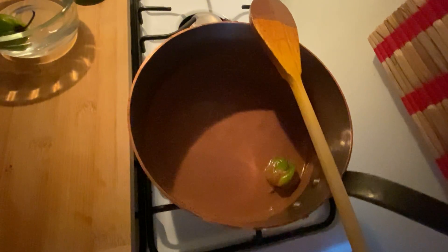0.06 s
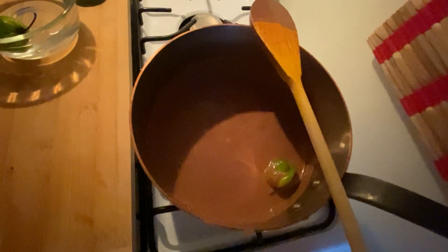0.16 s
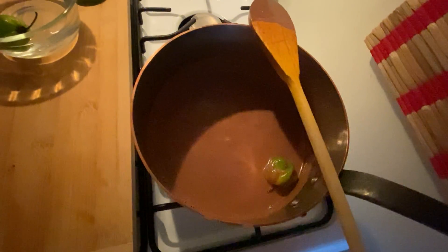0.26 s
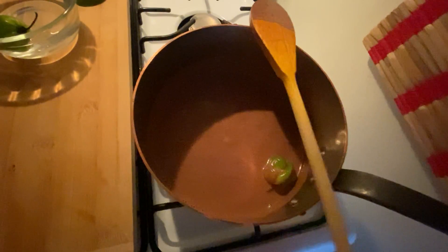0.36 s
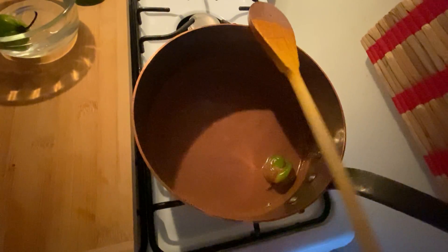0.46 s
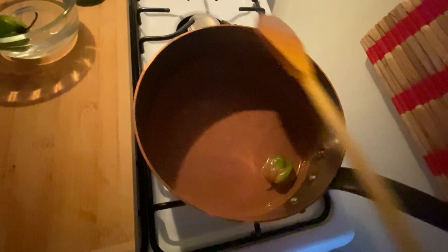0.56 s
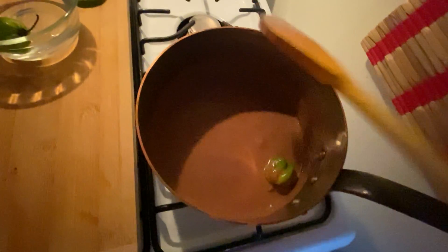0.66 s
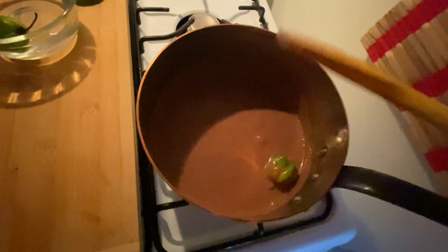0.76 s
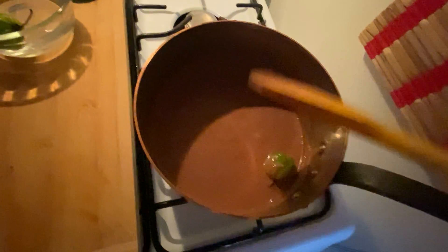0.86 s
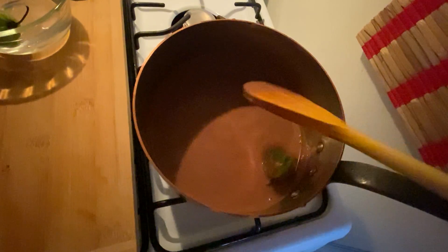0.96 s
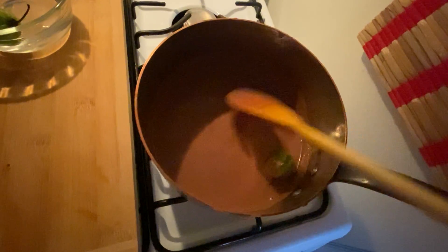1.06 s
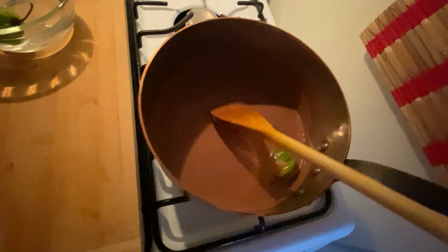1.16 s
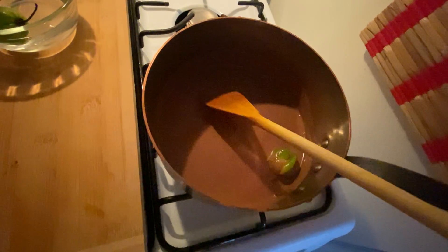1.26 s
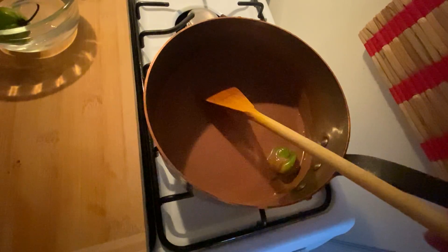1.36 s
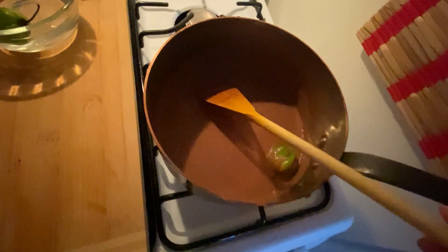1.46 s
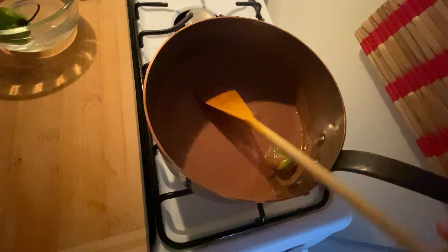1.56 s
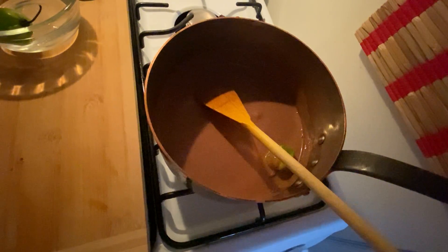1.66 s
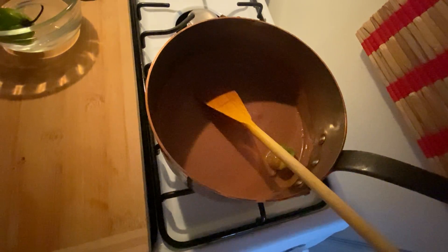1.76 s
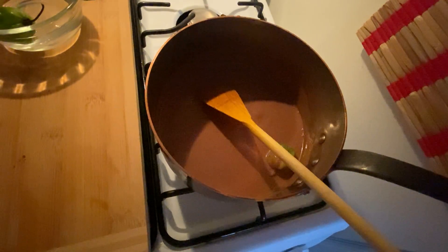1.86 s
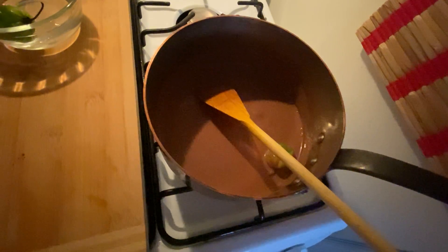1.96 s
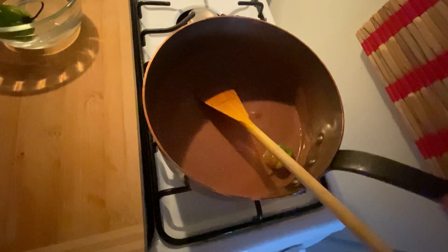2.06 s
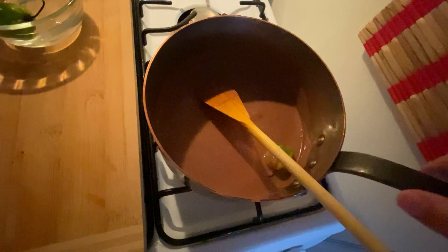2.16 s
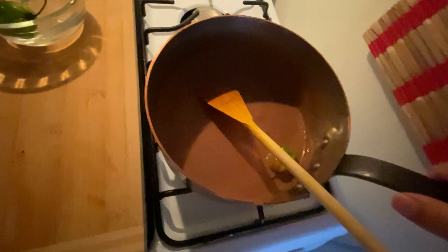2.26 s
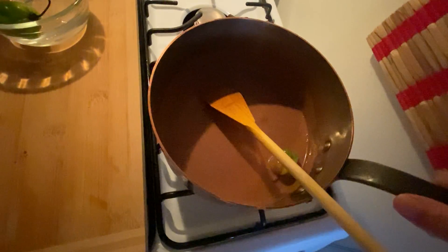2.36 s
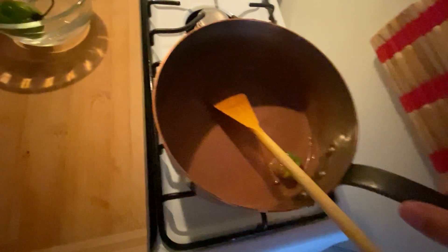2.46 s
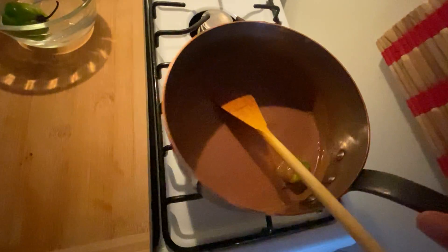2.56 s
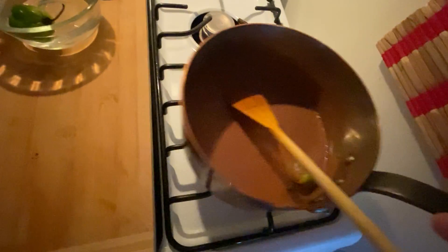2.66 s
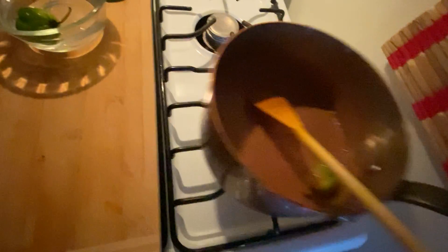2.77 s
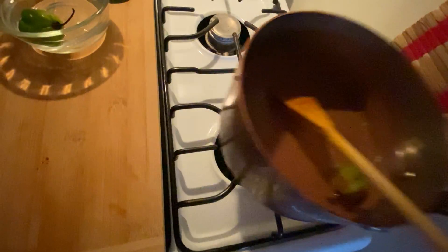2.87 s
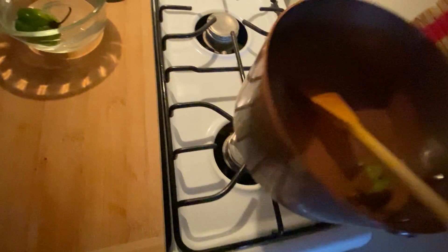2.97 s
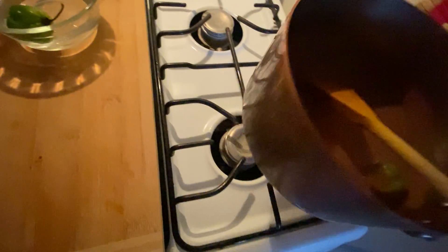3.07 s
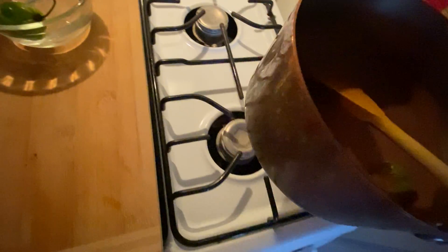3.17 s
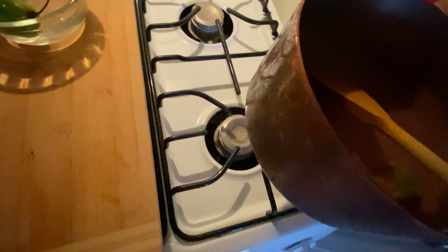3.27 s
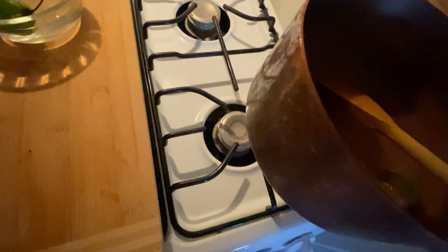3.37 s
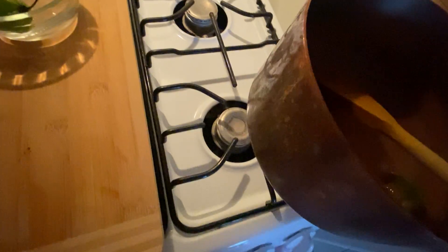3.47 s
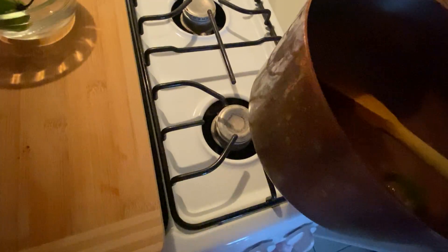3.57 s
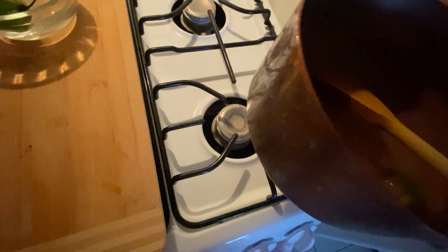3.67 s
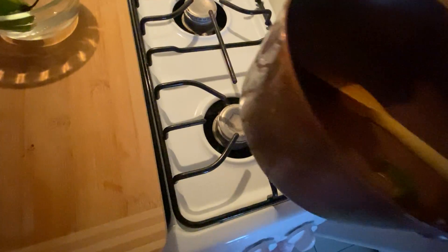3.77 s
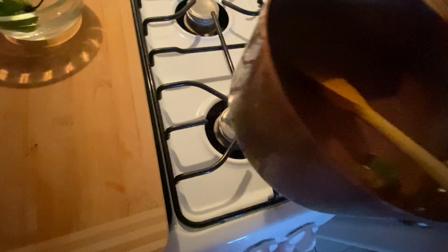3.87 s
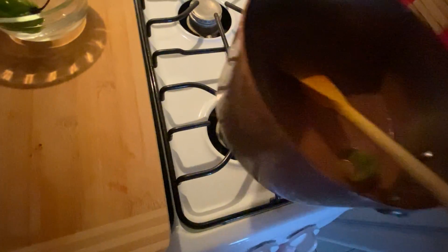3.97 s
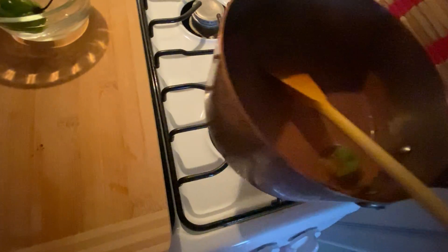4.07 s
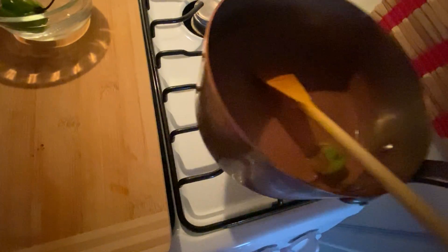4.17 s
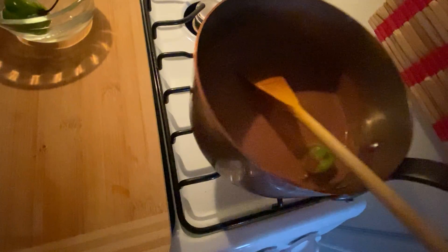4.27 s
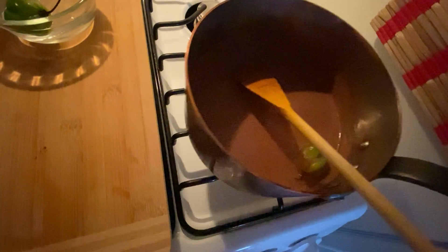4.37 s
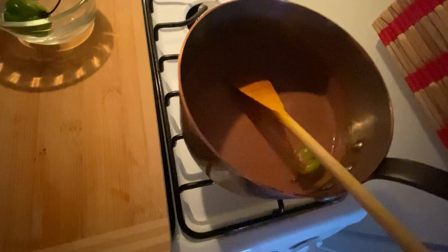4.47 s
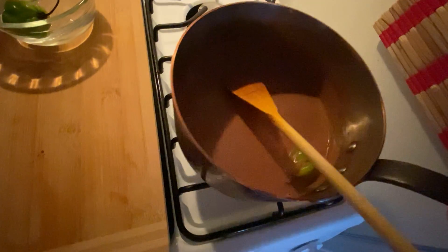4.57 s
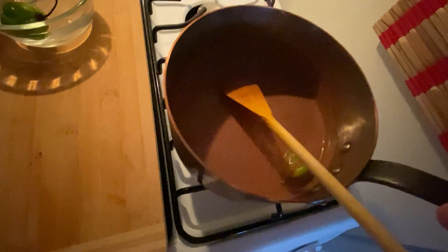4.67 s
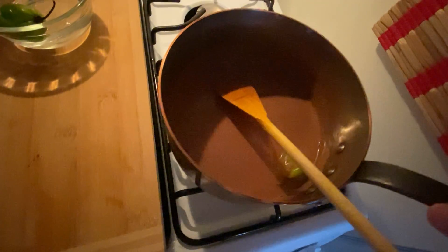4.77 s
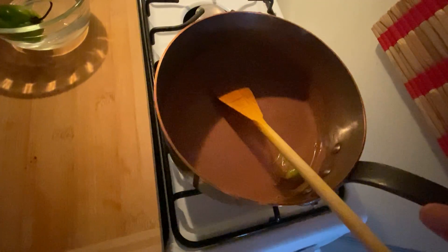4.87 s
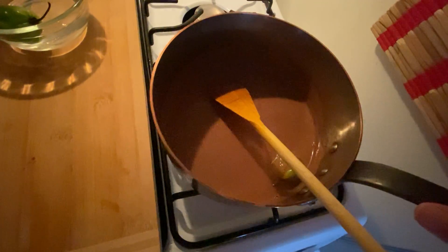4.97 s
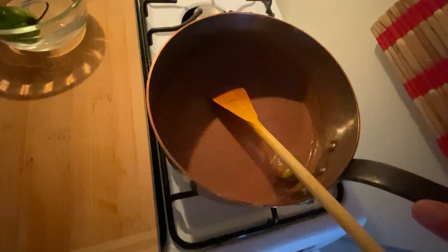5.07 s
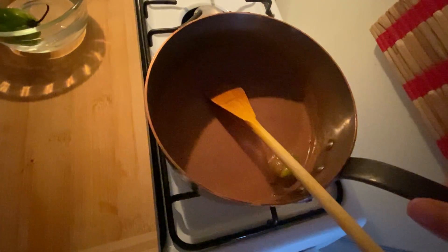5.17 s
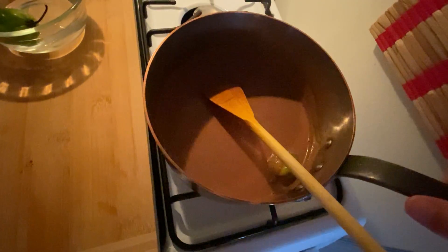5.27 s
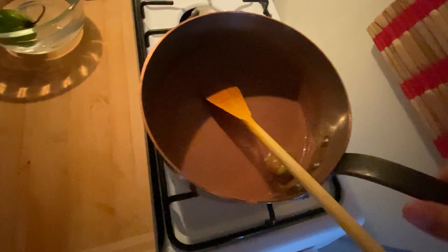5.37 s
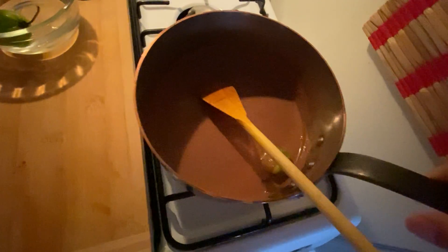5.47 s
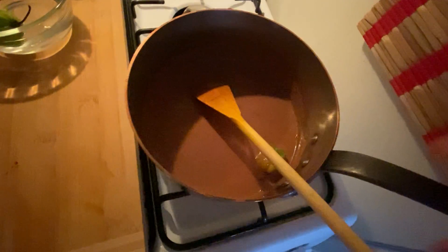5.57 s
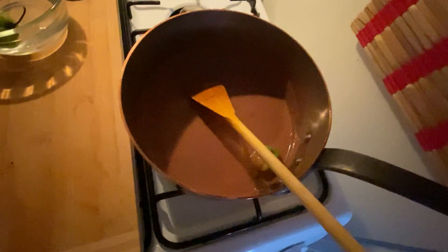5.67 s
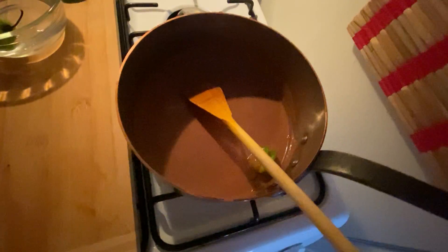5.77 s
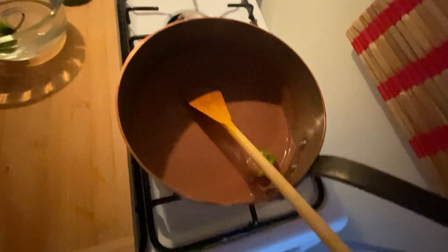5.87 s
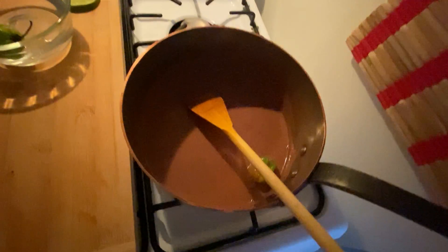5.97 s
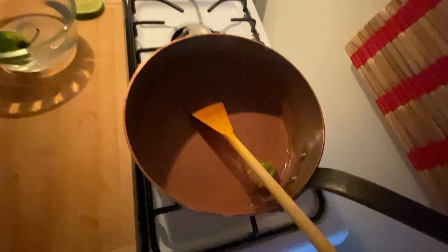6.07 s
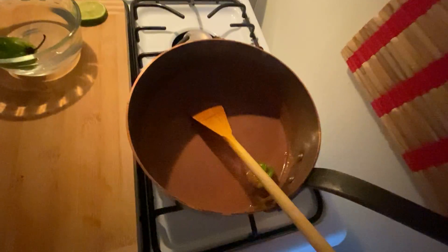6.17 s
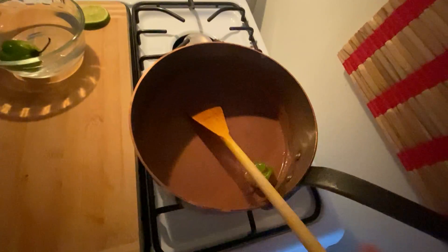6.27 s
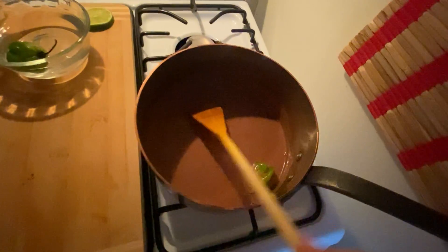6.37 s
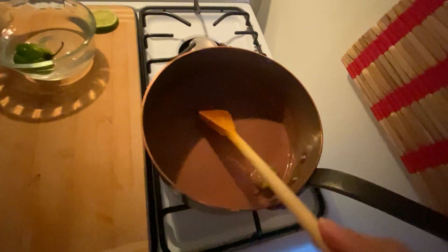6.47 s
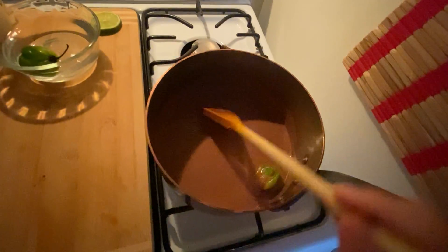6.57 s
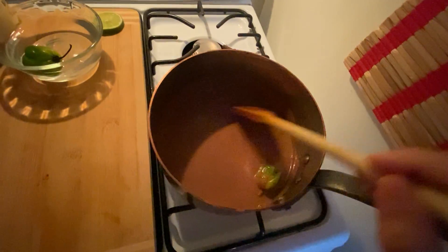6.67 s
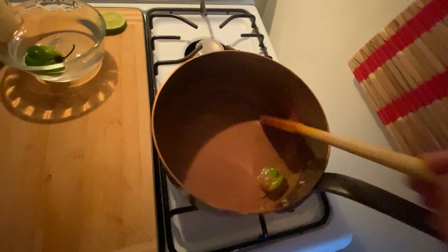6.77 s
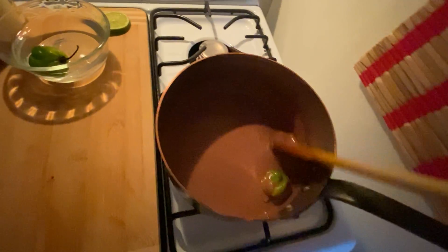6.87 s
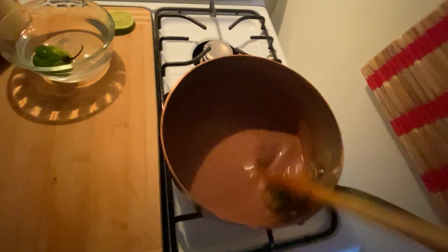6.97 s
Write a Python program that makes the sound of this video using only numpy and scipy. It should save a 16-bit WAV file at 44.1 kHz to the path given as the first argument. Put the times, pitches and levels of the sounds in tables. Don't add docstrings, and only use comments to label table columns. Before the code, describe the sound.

In a small kitchen, a low refrigerator hum with a faint buzz runs throughout. Soft sleeve and finger rubs lead to a woody knock as a spoon is laid in a copper pan, then settles on its rim. The pan rattles off an iron grate, ticks while held, lands with a loud clatter, is nudged, and the spoon raps the rim. Close handheld stereo microphone.

```python
import sys
import numpy as np
from scipy import signal
from scipy.fft import rfft, irfft, next_fast_len
from scipy.io import wavfile
from scipy.ndimage import uniform_filter1d, map_coordinates

SR = 44100
rng = np.random.default_rng(int(sys.argv[2]) if len(sys.argv) > 2 else 0)


def int16_out(signal):
    q = np.round(np.clip(np.atleast_2d(signal).T, -1, 1) * 32767)
    wavfile.write(sys.argv[1], SR, q.astype(np.int16))


def rack_gain(trim_db):
    fader = np.asarray(trim_db, float)
    return 10 ** (fader / 20)


N = 309582
EAR = np.array([[.5], [-.5]])

# start_s, nearness_db
NEARNESS = [(0, -0.5), (1.1, -2), (2.3, -3), (3.1, -1), (4.0, -4.5), (5.8, -2.5), (7.02, -3)]


def unit(x):
    return x / np.sqrt(np.mean(x ** 2) + 1e-20)


def along(points, hz, column=1):
    table = np.transpose(points)
    return np.interp(np.log(hz + 1), np.log(table[0] + 1), table[column])


def curves(rows):
    s, *columns = np.transpose(rows)
    t = np.arange(N) / SR
    return [np.interp(t, s, column) for column in columns]


def wobble(rate):
    knots = rng.standard_normal(int(N * rate / SR) + 4)
    return map_coordinates(knots, [np.arange(N) * rate / SR])


def filtered(x, response):
    m = next_fast_len(N + SR // 2)
    return irfft(rfft(x, m) * response(np.fft.rfftfreq(m, 1 / SR)), m)[..., :N]


def resonances(peaks):
    def response(f):
        return sum((-1) ** k * rack_gain(db) * 1j * f * width / (hz * hz - f * f + 1j * f * width)
                   for k, (hz, width, db) in enumerate(peaks))
    return response


def rush(spectrum, alike):
    def mid_and_side(hz):
        turn = np.arccos(np.clip(along(alike, hz), -1, 1)) / 2
        return rack_gain(along(spectrum, hz)) * [np.cos(turn), np.sin(turn)]
    mid, side = filtered(rng.standard_normal((2, N)), mid_and_side)
    return unit(np.array([mid + side, mid - side]))


def dying(length, t60, gain_db, alike):
    left, other = rng.standard_normal((2, length))
    right = alike * np.roll(left, shift=-3) + np.sqrt(1 - alike ** 2) * other
    hz, t, z = signal.stft([left, right], SR, nperseg=256, noverlap=192)
    fade_db = gain_db(hz)[:, None] - 60 * t / t60(hz)[:, None]
    return signal.istft(z * rack_gain(fade_db), SR, nperseg=256, noverlap=192)[1][:, :length]


def cookware():
    # pitch_hz, level_db, t60_s
    iron = [(437.8, 4.5, 0.16), (739, -5, 0.18), (860, -4, 0.27), (949, -5.5, 0.12), (1004, -3.5, 0.18),
            (1194, 0, 0.4), (1252, -1, 0.19), (1310, -8, 0.27), (1398, -9, 0.13), (1548, 0.5, 0.28),
            (1790, -13, 0.25), (1925, 4.5, 0.2), (1830, -10, 0.14), (2420, -9, 0.37), (2840, -9, 0.31),
            (3434, 3.5, 0.36), (3980, -13, 0.19), (4110, 2, 0.06), (4800, -19, 0.17), (5000, -9, 0.16),
            (5830, 0.5, 0.058), (6100, -5, 0.08), (6640, -2, 0.15), (7700, -8, .12)]
    # pitch_hz, level_db, t60_s
    floor = [(420, -1, 0.086), (521, 4.5, 0.11), (760, -19, 0.06), (900, 6.5, 0.15), (1050, -20, 0.11),
             (1240, -11, .15), (1353, 1, 0.11), (1550, -12, 0.3), (2150, -1.5, 0.053), (2380, -5, 0.051)]
    # pitch_hz, level_db, t60_s
    ladle = [(637, -21, 0.1), (3365, 6, 0.063), (3570, -7, 0.021), (4170, 5, 0.011), (5500, 1, 0.018)]
    # pitch_hz, level_db, t60_s
    copper = [(694, -18, .2), (990, -9, .07), (1250, -6, .05), (1534, -6, .045), (1800, -4, .03),
              (2080, -10, .055), (3230, -16, .12), (3380, -16, .14), (3750, -5, .07)]
    # pitch_hz, level_db, t60_share
    clatter = [(100, -7.5, 2.3), (430, -6, 4.9), (497, -15.5, 4.1), (720, 5, 1.36), (1530, 2.5, 0.56),
               (2410, 0.5, 0.9), (3880, 3.5, 0.66), (7650, -4, 0.68), (8730, -9.5, 0.6), (10040, -8, 0.42),
               (13500, -17, 0.48), (15900, -22, 0.51)]
    # pitch_hz, level_db, t60_share
    knock = [(150, -17, 1.7), (440, 4, 0.38), (784, -5, 0.92), (2220, -11.5, 0.61), (3600, -16, 0.96),
             (6000, -22, 0.78), (16000, -33, 0.34)]
    # pitch_hz, level_db, t60_share
    tap = [(150, -45, 1.5), (625, 1.5, 3), (1000, -2.5, 1.4), (2230, -15, 2.6), (2700, -27, .6),
           (3300, 6, 0.52), (6000, -20, .4), (16000, -38, .3)]
    # start_s, peak_db, weight_db (in the lows), hardness_db (in the highs)
    lift_hits = [(2.364, -49, 5, -22), (2.479, -47, -4, -12), (2.4855, -32.5, -4.5, -12),
                 (2.51, -42, -7, -24), (2.522, -45, 3, -30), (2.573, -42.5, 1, -11), (2.579, -41, 7.5, -33),
                 (2.588, -38, 7.5, -26), (2.615, -28.5, -10, -17), (2.621, -31.5, -8, -32),
                 (2.6453, -44.5, -6, -7), (2.675, -48.5, -8, -5), (2.6849, -46, 9, -20),
                 (2.705, -45.5, 3, -39), (2.758, -57, 3, -36)]
    land_hits = [(4.981, -48, -10, -17), (4.9935, -26, -5, -21.5), (5.0035, -22, -3, -7),
                 (5.0173, -29, -36, -21), (5.04, -39, 6, -20), (5.062, -44, 0, -23),
                 (5.0889, -26.5, -1, -10), (5.107, -37, -4, -10), (5.1254, -24, -2, -13),
                 (5.133, -27.5, -7, 0), (5.1378, -20, -7.5, -2.5), (5.1463, -21.5, -16, -27),
                 (5.157, -31, -12.5, -19), (5.1686, -30, 2, -38), (5.178, -32.5, 4, -21),
                 (5.2027, -36.5, 5, -18), (5.225, -47, 3, -15), (5.255, -45, -1, -30)]
    nudge_hits = [
        (5.416, -51, -2, -20),
        (5.468, -45, 10, -15),
        (5.504, -37, -10, -15.5),
        (5.5193, -41, 6.5, -25),
        (5.542, -49.5, 9, -23),
        (5.598, -56, 6, -33),
    ]
    scuff_hits = [
        (2.847, -46.5, 0.58, -36),
        (2.918, -48.5, 2, -26),
    ]
    lay_hits = [
        (1.029, -56, 5, -15),
        (1.1975, -27.5, -3, -12.5),
        (1.211, -32, -29, -19),
        (1.22, -39.5, -13, -12),
        (1.234, -38, -8, -28),
        (1.255, -48, -10, -28),
        (1.29, -51, 2, -29),
        (1.35, -54.5, 14, 5),
        (1.389, -46, -2, -11),
        (1.51, -54, 2, -5),
    ]
    settle_hits = [
        (1.6597, -32, -1, -18),
    ]
    rim_hits = [
        (6.812, -32.5, -15, -17.5),
    ]

    grate = (iron, clatter, (450, 1600, 5600))
    wood_hz = (320, 1200, 3900)
    lift = contacts(lift_hits, *grate, t60=0.22, pan_db=4.5, ring_db=-22, noise_db=2.0, crack_db=7.5,
                    body_db=8.5, damping=0.55, attack=0.0013)
    land = contacts(land_hits, *grate, t60=0.18, pan_db=4.0, ring_db=-24, noise_db=5.0, crack_db=1,
                    body_db=5.0, damping=0.64, attack=0.00091)
    nudge = contacts(nudge_hits, *grate, t60=0.2, pan_db=3.5, ring_db=-21, noise_db=4.5, crack_db=10.0,
                     body_db=4.5, damping=1.0, attack=0.00075)
    lay = contacts(lay_hits, floor, knock, wood_hz, t60=0.13, pan_db=4.5, ring_db=-17.5, noise_db=14.0,
                   crack_db=3.0, body_db=4.5, damping=0.46, attack=0.00086)
    settle = contacts(settle_hits, ladle, tap, wood_hz, t60=0.13, pan_db=2.5, ring_db=-6.0, noise_db=1.0,
                      crack_db=22.5, body_db=9.0, damping=.05, attack=0.00068)
    rim = contacts(rim_hits, copper, tap, wood_hz, t60=0.11, pan_db=5.0, ring_db=0.5, noise_db=8.0,
                   crack_db=16.0, body_db=-22, damping=0.0046, attack=0.00023)
    scuff = contacts(scuff_hits, *grate, t60=0.19, pan_db=6, ring_db=-29, noise_db=4.5, crack_db=-11,
                     body_db=4, damping=0.5, attack=0.0053)
    return scuff + lift + land + nudge + lay + settle + rim + struck() + ticks() + chatter() + squeaks()


def contacts(events, modes, colour, pivots_hz, t60, pan_db, ring_db, noise_db, crack_db, body_db, damping, attack):
    out, t = np.zeros((2, N + SR)), np.arange(SR // 3) / SR
    hz, level_db, ring_t60 = np.transpose(modes)[:, :, None]
    held_t60 = 1 / (1 / ring_t60 + damping / t60)
    rise = 1 - np.exp(-t / attack)
    for s, db, low_db, high_db in events:
        def tilt(f):
            return along(list(zip(pivots_hz, (low_db, 0, high_db))), f)

        apart = rng.uniform(-np.pi, np.pi, (len(hz), 1))
        phase = rng.uniform(0, 2 * np.pi, (len(hz), 1)) + EAR[:, :, None] * apart
        struck_db = level_db + 1.8 * rng.standard_normal(phase.shape)
        fading = rack_gain(struck_db + tilt(hz) - 60 * t / held_t60)
        ring = np.sum(fading * np.sin(2 * np.pi * hz * t + phase), axis=1)

        rattle = dying(len(t), lambda f: t60 * along(colour, f, column=2),
                       lambda f: along(colour, f) + tilt(f), alike=0.12)
        crack = rack_gain(crack_db - 60 * t / 0.0075)
        rattle = rattle * (rack_gain(noise_db) + crack) * rise
        width_hz = np.log(1000) / np.pi / held_t60
        body = resonances(np.hstack([hz, width_hz, struck_db[0] + body_db]))
        rattle = irfft(rfft(rattle) * (1 + body(np.fft.rfftfreq(len(t), 1 / SR))), len(t))

        blow = rack_gain(ring_db) * ring * rise + rattle
        out[:, round(s * SR):][:, :len(t)] += rack_gain(db + pan_db * EAR) * blow
    return out[:, :N]


def struck():
    # start_s, pitch_hz, peak_db, t60_s, left_lead_rad
    lifting = [(1.1974, 760, -17.5, 0.027, -1.4), (1.198, 547, -30, .03, -1.5),
               (1.2115, 720, -24, 0.017, -2.5), (1.23, 1490, -51, 0.18, 1), (1.23, 948, -41, 0.18, -2.5),
               (2.487, 1380, -55, 0.13, 3), (2.524, 200, -46, 0.058, -3), (2.615, 1284, -34, 0.13, 4.5),
               (2.617, 767, -37, 0.089, 0.7), (2.62, 220, -35.5, 0.066, 0.5), (2.622, 1030, -44, .15, 1.9),
               (2.58, 1048, -39, .2, 2), (2.627, 1935, -39, 0.12, -.4), (2.622, 1480, -39, .08, -.4),
               (2.645, 1398, -37.5, 0.1, -1), (2.643, 1222, -45, 0.15, -1), (2.487, 3300, -47, .14, 1.5),
               (2.487, 4350, -52, .1, 0), (2.616, 3400, -48, .1, 0), (2.616, 4270, -52, .1, 1.5),
               (2.728, 170, -34.5, 0.083, -1), (2.86, 150, -40, 0.22, -0.5)]
    # start_s, pitch_hz, peak_db, t60_s, left_lead_rad
    landing = [(4.994, 734, -29, 0.057, -1), (4.995, 1347, -28, 0.066, 4), (5.003, 1400, -31, 0.12, 0.5),
               (5.004, 1710, -32.5, 0.11, -1), (5.012, 431, -35.5, 0.4, 1.45),
               (5.014, 1950, -29, 0.086, -1), (5.022, 995, -33, .12, -3.5), (5.09, 1500, -41, 0.14, 2),
               (5.004, 3074, -36, .1, 1), (5.093, 2400, -35, .04, 2), (5.14, 2885, -36, 0.13, 1),
               (5.139, 3900, -40, .15, 1), (5.1255, 740, -26, 0.05, -1), (5.126, 3400, -36, .03, 0),
               (5.14, 4090, -33, .1, 1), (5.134, 1733, -29, 0.107, 1), (5.144, 1973, -29.5, 0.092, 1),
               (5.145, 2320, -29, 0.086, 2), (5.142, 4160, -26, 0.055, -2.9), (5.16, 1218, -39, 0.28, -5),
               (5.15, 449.6, -30.5, 0.37, .5), (5.175, 860, -35, 0.35, 5), (5.17, 237, -31.5, 0.1, 0),
               (5.24, 850, -46, 0.2, 1), (5.504, 950, -40, 0.12, 1.5), (5.52, 1307, -48, .15, -1)]
    # start_s, pitch_hz, peak_db, t60_s, left_lead_rad
    rim = [(1.6603, 710, -34, 0.02, -0.6), (6.811, 1000, -32.5, 0.027, 0), (6.811, 1540, -24, 0.015, -1.2),
           (6.811, 2070, -32, 0.029, 1), (6.812, 926, -51, 1.15, -0.76), (6.812, 1427, -48.5, 1.4, -1.4),
           (6.83, 1020, -52, .04, 0), (6.811, 3208, -47, 0.091, 0), (6.811, 3365, -49, 0.18, 0.8),
           (1.4, 4100, -52, .015, 0)]
    out, t = np.zeros((2, N + SR)), np.arange(SR // 3) / SR
    rise = 1 - np.exp(-t / 0.00088)
    for s, hz, db, t60, lead in lifting + landing + rim:
        fading = rack_gain(db + 2.5 * EAR - 60 * t / t60)
        out[:, round(s * SR):][:, :len(t)] += fading * rise * np.sin(2 * np.pi * hz * t + EAR * lead)
    return out[:, :N]


def ticks():
    # start_s, peak_db, lower_ring_db, upper_ring_db, left_right_db
    snaps = [
        (2.587, -44.5, 1.5, -16, 0),
        (2.7272, -60, -4, -21, 0.5),
        (2.9068, -55, -8, -15, -0.5),
        (2.9957, -47, -15, -10, -0.5),
        (3.057, -44.5, -0.5, -28, 4),
        (3.0874, -33, -18, -8, 4),
        (5.5024, -42.5, -8, -31, 2),
    ]
    out, t = np.zeros((2, N)), np.arange(400) / SR
    for s, db, lower_db, upper_db, pan_db in snaps:
        for late_s, echo_db in [(0, 6), (.0006, 0), (.0016, -9), (.003, -15)]:
            u = t - .0007 - late_s
            rings = rack_gain(lower_db) * np.sin(2 * np.pi * 11000 * u)
            rings += rack_gain(upper_db) * np.sin(2 * np.pi * 15200 * u)
            rings += rack_gain(-24) * np.sin(2 * np.pi * 6500 * u)
            burst = np.exp(-(u / 0.00013) ** 2) * rings
            out[:, round(s * SR):][:, :len(t)] += rack_gain(db + echo_db + pan_db * EAR) * burst
    return out


def chatter():
    # start_s, length_s, from_hz, to_hz, level_db
    glides = [
        (1.185, .04, 250, 240, -40),
        (1.34, .09, 272, 318, -37),
        (5.165, .1, 140, 128, -33),
        (5.23, .1, 130, 130, -44),
        (5.16, .12, 290, 262, -41),
        (1.66, .074, 1965, 1965, -58.5),
        (5.035, .056, 3074, 3074, -50),
        (5.195, .052, 3467, 3467, -52),
    ]
    out = np.zeros(N)
    for s, length_s, from_hz, to_hz, db in glides:
        turn = 2 * np.pi * np.cumsum(np.linspace(from_hz, to_hz, round(length_s * SR))) / SR
        overtones = sum(np.sin(k * turn) for k in range(2, 7) if k * to_hz < SR / 2)
        tone = np.sin(turn) + rack_gain(-29.5) * overtones
        out[round(s * SR):][:len(turn)] += rack_gain(db) * np.sqrt(np.hanning(len(turn))) * tone
    return out * rack_gain([[1.2], [-1.2]])


def squeaks():
    # start_s, pitch_hz, level_db
    whistles = [
        (0.576, 3300, -61),
        (0.603, 3300, -62),
        (0.639, 3360, -61),
        (6.312, 4280, -63),
        (6.411, 3130, -63),
        (6.408, 4300, -62),
        (6.425, 4170, -56),
    ]
    length_s, waver_share = 0.023, 0.025
    out = np.zeros(N)
    waver = 1 + waver_share * wobble(340)
    swell = np.sqrt(np.hanning(round(length_s * SR)))
    for s, hz, db in whistles:
        at = slice(round(s * SR), round(s * SR) + len(swell))
        out[at] += rack_gain(db) * swell * np.sin(2 * np.pi * hz * np.cumsum(waver[at]) / SR)
    return out * rack_gain([[1.2], [-1.2]])


def moves():
    # start_s, held_s, rub_db, slide_db
    strokes = [(.01, 0.0037, -90, -49.5), (.2, 0.052, -87, -77), (.375, 0.022, -70, -59),
               (.476, 0.02, -67, -59), (.52, 0.04, -69, -62), (0.599, 0.025, -67.5, -52),
               (.7, 0.045, -79, -80), (1.03, 0.0056, -83, -53), (1.25, 0.14, -75, -73),
               (1.39, 0.022, -71, -57), (1.508, 0.15, -74.5, -85), (1.664, .005, -71.5, -53),
               (2.1, 0.29, -83, -90), (2.37, 0.06, -81, -62), (2.494, 0.15, -65, -57),
               (2.592, 0.037, -63.5, -66), (2.78, .22, -100, -68), (3.09, .005, -89, -55),
               (3.15, 0.075, -96, -63), (4.975, 0.015, -96, -63), (5.2, 0.09, -80, -56),
               (5.42, 0.015, -72.5, -55.5), (5.515, 0.007, -72, -51), (6.3, 0.12, -74.5, -74),
               (6.42, 0.045, -70.5, -62), (6.55, .1, -79, -80), (6.72, .01, -73, -59),
               (6.81, 0.014, -70.5, -48), (7.0, 0.022, -78, -58)]
    # pitch_hz, level_db
    rub_colour = [(1500, -34), (3000, -4.5), (4200, -2.5), (7500, -4), (9000, -10.5), (10600, -4),
                  (12200, -13.5), (13500, -12), (15200, -3), (16200, -58)]
    # pitch_hz, level_db
    slide_colour = [(150, -6), (300, -34), (800, -6.5), (1500, -11.5), (3000, -19.5), (5000, -21.5),
                    (9000, -46)]
    rise_db_per_s, fall_db_per_s = 590, 237
    t = np.arange(0, N / SR + .002, .001)
    s, held_s, rub_top_db, slide_top_db = np.transpose(strokes)[:, :, None]
    shape_db = -rise_db_per_s * np.maximum(s - t, 0) - fall_db_per_s * np.maximum(t - s - held_s, 0)
    rub_path_db = np.max(rub_top_db + shape_db, axis=0)
    slide_path_db = np.max(slide_top_db + shape_db, axis=0)
    rub_db, slide_db = curves(np.transpose([t, rub_path_db, slide_path_db]))
    rub = rack_gain(rub_db + 8.0 + 2.2 * wobble(90)) * rush(rub_colour, [(1000, 0.075)])
    slide = rack_gain(slide_db - 7.5 + 2.3 * wobble(60)) * rush(slide_colour, [(200, 0.68), (700, 0.065)])
    return rub + slide


def hollow():
    # pitch_hz, width_hz, level_db
    cavity = [(1273, 65, -4), (1460, 60, -8)]
    # start_s, level_db
    raised = [(0, -84), (.5, -84), (1.2, -95), (2.5, -95), (2.8, -74), (3.7, -77), (4.5, -87), (5, -95),
              (7.02, -95)]
    air = unit(filtered(rng.standard_normal((2, N)), lambda f: resonances(cavity)(f) ** 2))
    return rack_gain(curves(raised)[0] + 2 * wobble(5)) * air


def kitchen(x):
    # pitch_hz, t60_s
    decay = [(200, 0.59), (1000, 0.49), (4000, 0.35), (12000, 0.22)]
    tail = dying(SR // 2, lambda f: along(decay, f), lambda f: along([(200, -16.5), (500, -17)], f), alike=0.06)
    delayed = np.pad(x, ((0, 0), (300, 0)))
    return signal.fftconvolve(delayed, tail / np.linalg.norm(tail[0]), axes=1)[:, :N]


def compressor():
    # pitch_hz, level_db
    steady = [(500, -5), (2000, 4.5), (3000, 1), (4000, 2.5), (5500, -4), (6500, -2), (7600, 3), (10500, 4),
              (11000, -45)]
    turns = np.cumsum(58.81 * (1 + .0001 * wobble(3.04))) / SR
    at = np.interp(np.arange(1, int(turns[-1])), turns, np.arange(N))
    taps = np.clip(np.floor(at)[:, None] + np.arange(-7, 9), 0, N - 1)
    away = taps - at[:, None]
    pulse = np.sinc(away) * np.cos(np.pi * away / 16)
    slaps = np.bincount(taps.astype(int).ravel(), pulse.ravel(), N)

    def scattered():
        path = rng.standard_normal((2, 900)) * rack_gain(-np.arange(900) * 0.0038)
        return signal.fftconvolve(slaps[None], path, axes=1)[:, :N]

    sway = 0.5 * wobble(1.2)
    paths = unit(np.cos(sway) * scattered() + np.sin(sway) * scattered())
    direct = rack_gain(-24) * unit(slaps)
    clean = filtered(unit(paths + direct), lambda f: rack_gain(along(steady, f)))
    gas = unit(rng.standard_normal((2, N)) * rack_gain(0.55 * np.cos(2 * np.pi * turns)))
    buzz = unit(filtered(clean + rack_gain(-5.5) * gas, housing))
    near_db, = curves(NEARNESS)
    level_db, follows = -65, -0.0022
    return rack_gain(level_db + follows * near_db + 1.0 * wobble(6.7)) * buzz


def housing(f):
    # pitch_hz, width_hz, level_db
    shell = [(590, 30, -6), (850, 110, -10), (1290, 70, -11), (1460, 50, -14), (1825, 35, -15.5),
             (2060, 40, -18), (2294, 40, -19), (2765, 40, -22), (3230, 40, -18), (3345, 35, -14),
             (3650, 50, -11), (3795, 90, -8), (4005, 50, -8), (4090, 60, -11), (4470, 110, -8),
             (4930, 150, -9.5), (5370, 130, -10), (5600, 80, -10), (5760, 80, -12), (5920, 100, -12),
             (6390, 110, -9), (6650, 160, -12), (7320, 200, -12), (7644, 40, -11), (8700, 150, -14),
             (8980, 250, -12), (10380, 300, -14)]
    peaks = resonances(shell)(f)
    valley_power = .55
    return peaks * abs(peaks) ** valley_power / (1 + (f / 11000) ** 40)


def patchy(x, depth_db):
    z = signal.stft(x, nperseg=512)[2]
    field = uniform_filter1d(rng.standard_normal(z.shape[1:]), size=5, axis=0)
    field = uniform_filter1d(field, size=30, axis=1)
    return signal.istft(z * rack_gain(depth_db * unit(field)), nperseg=512)[1][:, :N]


def fan():
    # multiple_of_fan_hz, rms_db, left_right_db, left_lead_rad
    blades = [(2.998, -48.5, 1, -0.1), (3.997, -50.5, 3.5, -0.28), (4.97, -62.5, 0.5, -2.4),
              (6.02, -69.5, -1, -1), (8, -60.5, 4.5, -0.5), (10.98, -70.5, 1, -1.54),
              (13.15, -75, -9, -1.34), (22.22, -82.5, 8, -0.47)]
    # pitch_hz, level_db_per_hz
    air_low = [(12, -63), (20, -19.5), (55, -8.5), (97, -12), (117, -7), (138, -6), (156, 0), (189, -10.5),
               (207, -5), (278, -2.5), (328, -8.5), (358, -10.5), (435, -18), (594, -38), (700, -34.5),
               (910, -73), (1540, -120)]
    # pitch_hz, level_db_per_hz
    air_high = [(260, -1), (450, -4.5), (882, -3), (1070, -15.5), (1860, -19.5), (2400, -24), (3700, -18),
                (5970, -23.5), (6530, -15), (8200, -26.5), (9000, -28), (9800, -35), (10700, -25),
                (11500, -45), (16000, -36)]
    # pitch_hz, likeness
    alike = [(30, 0.97), (130, .99), (290, 0.96), (640, -0.16), (1410, 0.37), (3100, -0.2), (6820, 0.1),
             (15000, 0.5)]
    near_db, = curves(NEARNESS)
    turn = 2 * np.pi * np.cumsum(45.0 * (1 + 0.0015 * wobble(2.37))) / SR
    tones = np.zeros((2, N))
    for k, db, pan_db, lead in blades:
        level = np.sqrt(2) * rack_gain(db + .9 * wobble(3.024) + EAR * pan_db)
        tones += level * np.sin(k * turn + k + EAR * lead)
    boom_db, boom_follows = -47, 0.67
    hiss_db, hiss_follows = -59, 0.65
    boom_level = rack_gain(boom_db + boom_follows * near_db + 0.99 * wobble(3.403) + EAR * 1.9)
    boom = boom_level * rush(air_low, alike)
    boom = np.array([np.roll(boom[0], shift=10), boom[1]])
    hiss = rack_gain(hiss_db + hiss_follows * near_db + 0.45 * wobble(2.21)) * rush(air_high, alike)
    return tones + boom + hiss


def scene():
    # pitch_hz, left_right_db
    lean = [(500, -2), (900, -2), (1600, -0.5), (2700, 2), (4200, -4), (8000, -4.5)]
    near = filtered(cookware(), lambda f: rack_gain(along(lean, f) * EAR))
    return near + rack_gain(-13.5) * kitchen(near) + moves() + fan() + hollow() + patchy(compressor(), depth_db=1.5)


def merged(x):
    merge_hz, in_step_hz, cycle_hz = 8500, 11250, 4500
    leak = .4

    def share(f):
        return 1 / (1 + (merge_hz / (f + 1)) ** 60)

    def turn(f):
        return np.exp(2j * np.pi * (f - in_step_hz) / cycle_hz * EAR)

    apart = filtered(x, lambda f: 1 - share(f) * (1 - leak))
    return apart + filtered(x.sum(axis=0) / np.sqrt(2), lambda f: share(f) * turn(f))


def top_cut(x):
    return signal.sosfilt(signal.butter(12, 16810, fs=SR, output="sos"), x)


def record(dry):
    # pitch_hz, level_db
    port = [(7500, 0), (8300, 1.5), (9200, -7.5), (10000, -2.5), (12500, -7), (13500, -2), (14800, -4.5),
            (15750, 2), (15950, -19), (16800, -24)]
    heard = filtered(dry, lambda f: rack_gain(along(port, f)))
    return top_cut(merged(heard))


dry = scene()
out = record(dry)
int16_out(out)
```